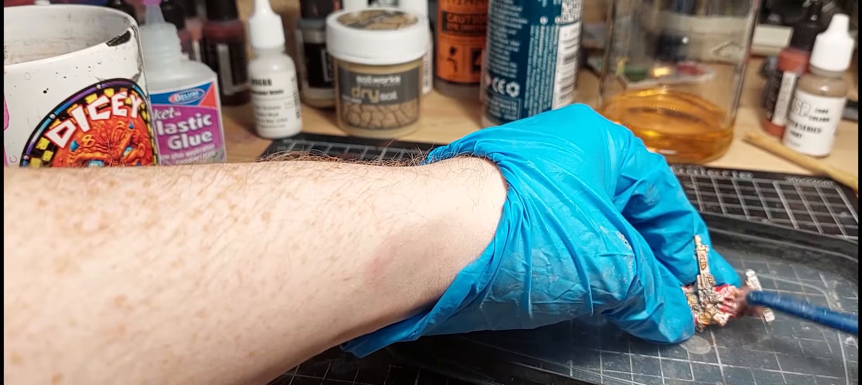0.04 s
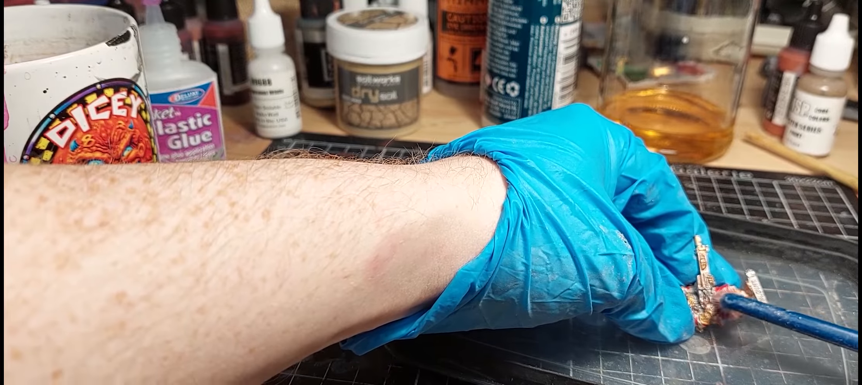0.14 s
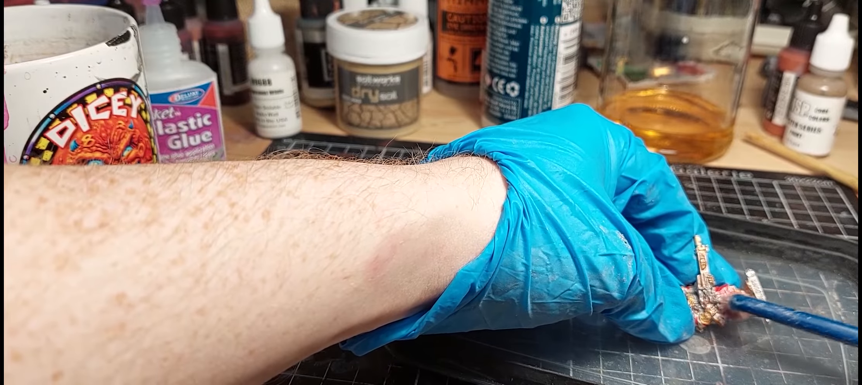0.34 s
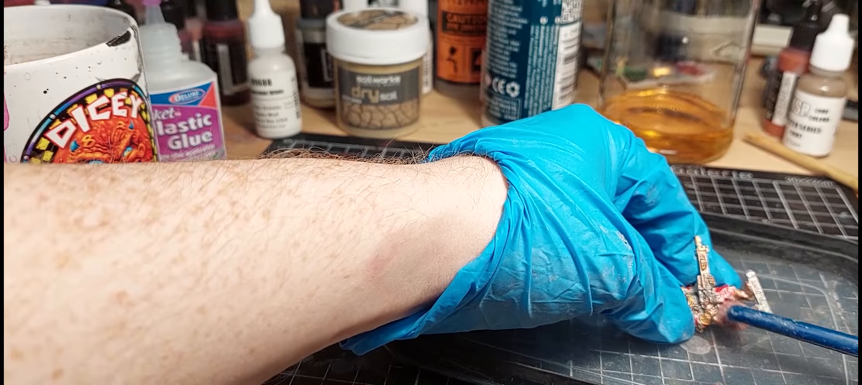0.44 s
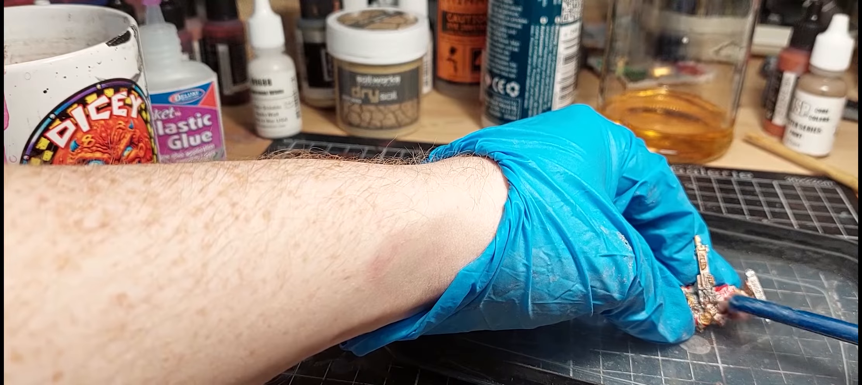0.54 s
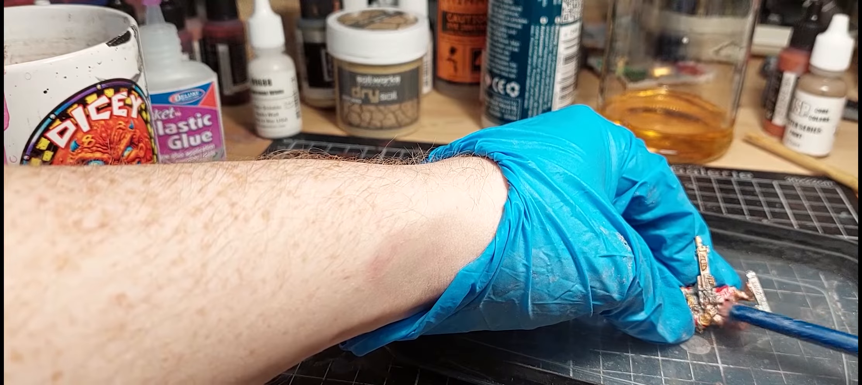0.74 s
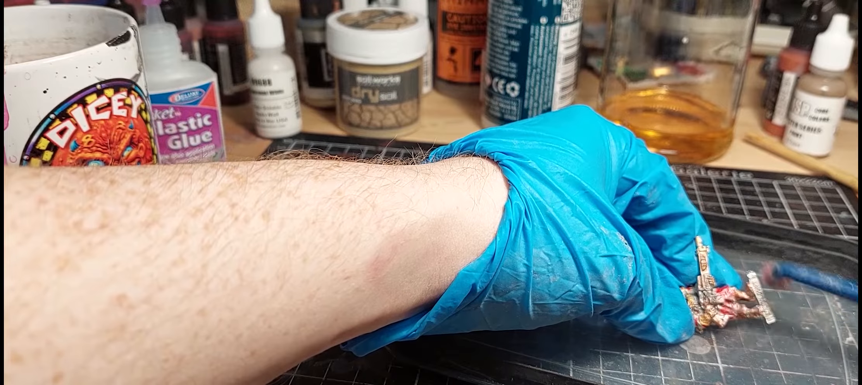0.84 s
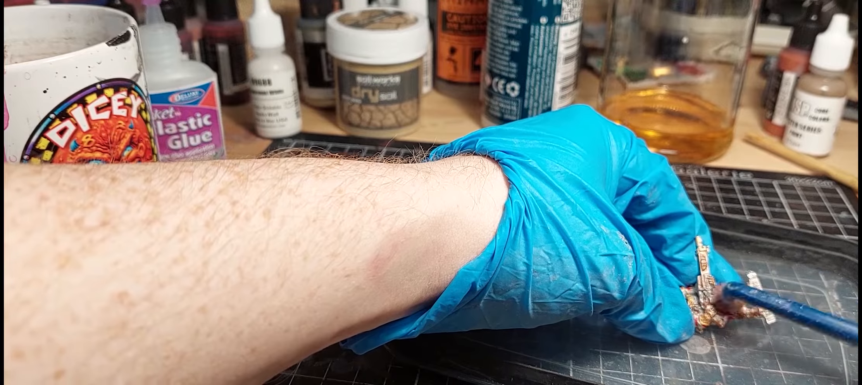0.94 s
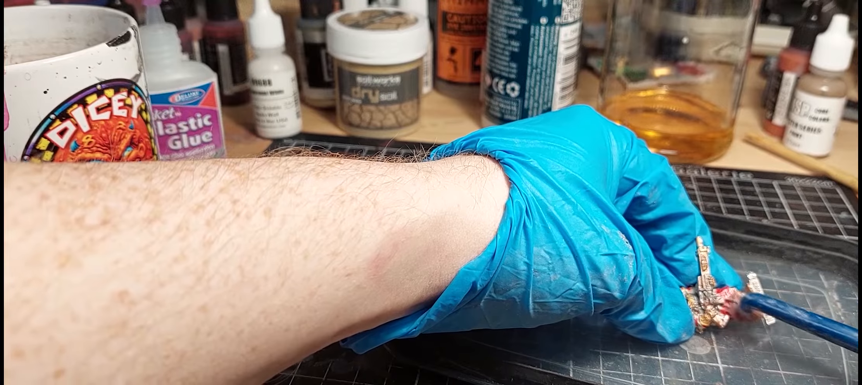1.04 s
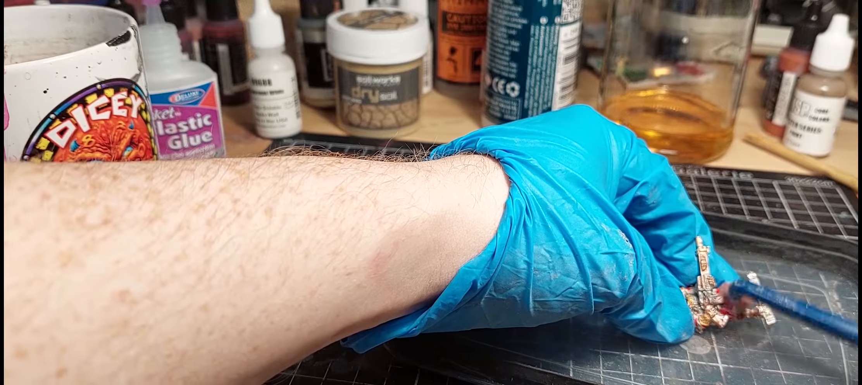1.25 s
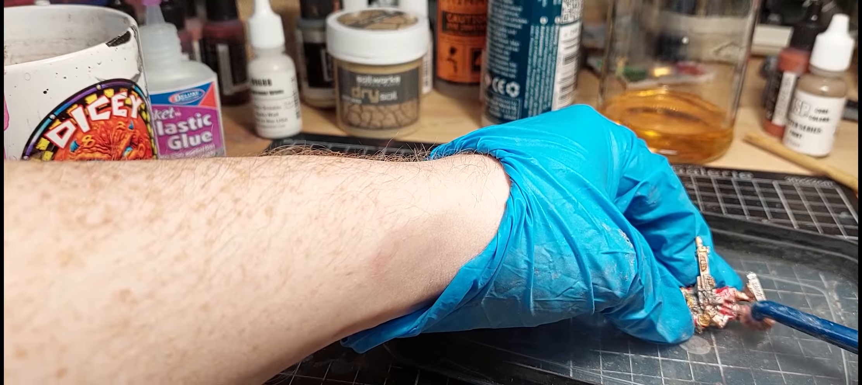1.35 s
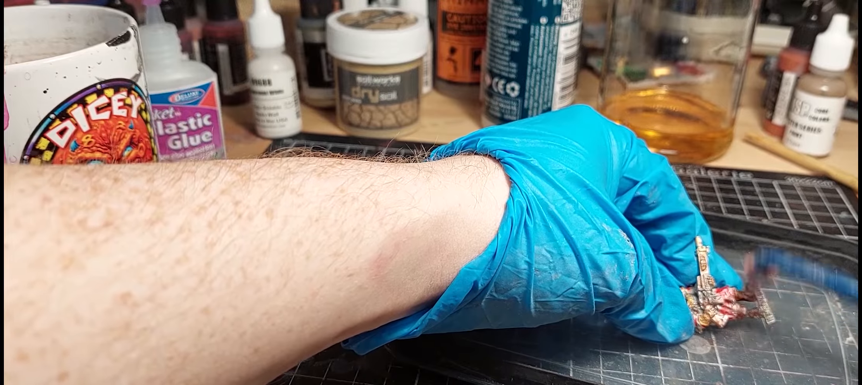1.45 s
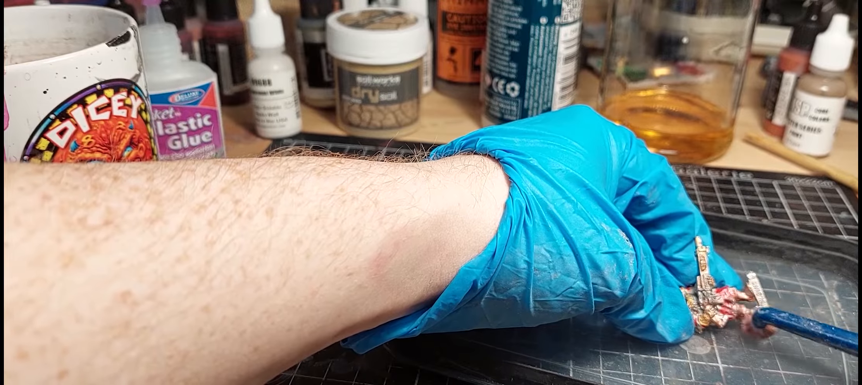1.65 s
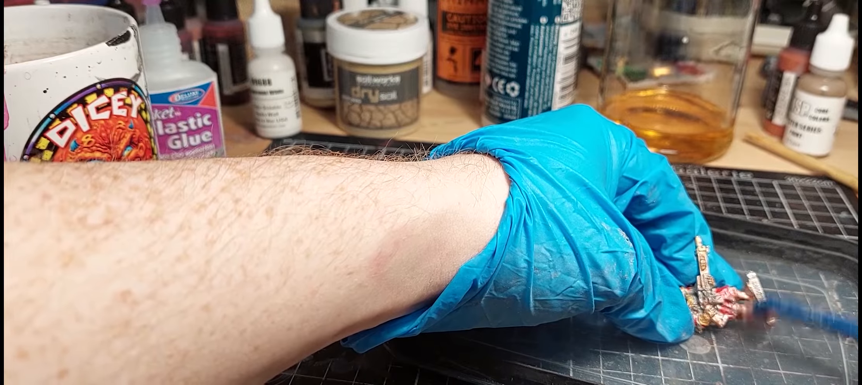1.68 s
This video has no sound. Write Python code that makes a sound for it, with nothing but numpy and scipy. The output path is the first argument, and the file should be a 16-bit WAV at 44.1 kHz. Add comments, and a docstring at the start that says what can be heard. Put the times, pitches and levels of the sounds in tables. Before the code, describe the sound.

Close, quick hissing strokes of a stiff little brush on a wet miniature, which now and then knocks softly against its tray.

```python
"""A small stiff brush scrubs a wet miniature figure held down on a tray, close by in a small room.
Tufts of bristles catch on the figure's edges and flick free with a tick; pressing harder adds a rasp
and makes the tray thrum. Now and then the figure knocks or judders on the tray, and once something
scuffs across it. Short echoes and a faint background rumble surround the work, heard in stereo."""
import sys
import numpy as np
from scipy import signal
from scipy.fft import rfft, irfft, next_fast_len
from scipy.io import wavfile
from scipy.ndimage import uniform_filter1d, map_coordinates

SR = 44100
rng = np.random.default_rng(int(sys.argv[2]) if len(sys.argv) > 2 else 0)


def bounce(signal):
    """Save signal as a 16-bit WAV file at the path given by the first command-line argument."""
    frames = np.transpose(np.atleast_2d(signal))
    limited = np.clip(frames, -1, 1)
    pcm = np.round(limited * 32767).astype(np.int16)
    wavfile.write(sys.argv[1], SR, pcm)


N = 302967


def amp(db):
    """Turn decibels into a gain to multiply by."""
    return 10 ** (np.asarray(db) / 20)


def rms(x):
    """The average strength of a signal (root mean square)."""
    return np.sqrt(np.mean(x ** 2))


def unit(x):
    """Scale a signal to an average strength of 1."""
    return x / np.sqrt(np.mean(x ** 2) + 1e-20)


def along(points, hz):
    """Read between the (frequency, value) rows of a table, on a log frequency axis."""
    f, values = np.transpose(points)
    return np.interp(np.log(hz + 1), np.log(f + 1), values)


def filtered(x, response):
    """Multiply each frequency in x by response(frequency)."""
    size = next_fast_len(N + SR // 4)
    return irfft(rfft(x, size) * response(np.fft.rfftfreq(size, 1 / SR)), size)[..., :N]


def coloured(x, spectrum):
    """Give x a tone colour (a balance of lows and highs), at strength 1."""
    return unit(filtered(x, lambda hz: amp(along(spectrum, hz))))


def resonance(f, centre, width):
    """How something that rings at one pitch answers to frequency f."""
    return 1j * f * width / (centre ** 2 - f ** 2 + 1j * f * width)


def wobble(rate):
    """A smooth random curve through rate points a second."""
    points = rng.standard_normal(int(N * rate / SR) + 4)
    return map_coordinates(points, [np.arange(N) * rate / SR])


def swell(start, length, attack_s, release_s, growth_db=0):
    """Gain of one touch: up 20 dB per attack_s, growing by growth_db, then down 20 dB per release_s."""
    t = np.arange(N) / SR - start
    rise = np.maximum(-t, 0) / attack_s
    fall = np.maximum(t - length, 0) / release_s
    still_to_grow = 1 - np.clip(t / length, 0, 1)
    return amp(np.maximum(-20 * (rise + fall) - growth_db * still_to_grow, -200))


# How alike left and right are: f/Hz, likeness (1 the same, 0 unrelated, -1 opposite)
STEREO_LIKENESS = [(100, 0.55), (300, 0.78), (500, 0.6), (900, 0.22), (2000, -0.14), (2700, -0.13),
                   (3500, 0.33), (4300, 0.19), (5200, 0.48), (6200, -0.3), (8200, -0.22), (9600, 0.16),
                   (11000, -0.054), (16000, 0.065)]
def noise_pair():
    """White noise that left and right partly share."""
    def shares(hz):
        angle = np.arccos(np.clip(along(STEREO_LIKENESS, hz), -1, 1)) / 2
        return np.array([np.cos(angle), np.sin(angle)])
    mid, side = filtered(rng.standard_normal((2, N)), shares)
    return np.array([mid + side, mid - side])


def slips(rate, life_s, spread_db):
    """Spiky power of tiny random slips, rate a second, each building up and dying away; average 1."""
    sizes = amp(spread_db * np.clip(rng.standard_normal(N), -1.7, 1.7)) ** 2
    spikes = sizes * (rng.random(N) < rate / SR)
    fading = signal.lfilter([1], [1, -np.exp(-1 / (life_s * SR))], spikes)
    power = np.abs(uniform_filter1d(fading, int(life_s * SR) + 1))
    return power / power.mean()


def grainy(power, steady_s):
    """Noise that follows a spiky power; the hand keeps the average force even over steady_s."""
    average = np.abs(uniform_filter1d(power, int(steady_s * SR) + 1)) + 1e-9
    return noise_pair() * np.sqrt(power / average)


def drifting(x, depth_db=2.0):
    """The tone colour drifts at random as the tuft bends and meets new edges."""
    spectrum = signal.stft(x, nperseg=512)[2]
    drift = rng.standard_normal(spectrum.shape[1:]) + rng.standard_normal(spectrum.shape) * 0.13
    drift = uniform_filter1d(drift, size=6, axis=1)  # smooth across frequency
    drift = uniform_filter1d(drift, size=16, axis=2)  # and across time
    return unit(signal.istft(spectrum * amp(depth_db * unit(drift)), nperseg=512)[1][:, :N])


# Brush strokes, with levels relative to each other:
# full contact t/s, time to rise 20 dB t/s, contact length t/s, hiss level/dB, rasp level/dB
BRUSH_STROKES = [ (0, .04, .008, -48, -62), (.066, .031, .011, -47, -63), (.152, .025, .018, -53, -72),
                 (.23, .041, .025, -44.5, -61), (.357, .046, .051, -53, -70.5),
                 (.448, .018, .103, -54, -70), (.596, .045, .012, -43.5, -60),
                 (.654, .043, .101, -48.5, -64), (.773, .043, .049, -40, -51), (.945, .04, .014, -55, -65),
                 (1.02, .049, .043, -44, -50), (1.294, .038, .021, -42, -54.5),
                 (1.569, .037, .034, -44.5, -57.5), (1.808, .015, .038, -60.5, -76.5),
                 (1.884, .038, .022, -39.5, -50), (1.984, .046, .021, -50.5, -68),
                 (2.081, .017, .038, -54, -60.5), (2.177, .064, .036, -42, -55),
                 (2.278, .039, .04, -54.5, -69.5), (2.432, .04, .04, -45.5, -57),
                 (2.55, .035, .043, -50, -66), (2.68, .05, .04, -47, -60.5),
                 (2.804, .051, .034, -45.5, -67), (2.847, .024, .035, -46.5, -42),
                 (2.938, .045, .014, -47, -45.5), (3.031, .019, .008, -48, -66),
                 (3.129, .03, .008, -46.5, -58), (3.18, .035, .064, -53, -66.5),
                 (3.33, .047, .065, -61, -75), (3.472, .05, .045, -45, -57.5),
                 (3.587, .039, .073, -51, -69), (3.73, .055, .05, -44.5, -59.5),
                 (3.833, .025, .045, -53.5, -69.5), (3.99, .052, .03, -41.5, -55),
                 (4.158, .02, .03, -62, -67), (4.197, .025, .025, -53, -60.5), (4.25, .025, .04, -64, -65),
                 (4.34, .07, .16, -70, -69), (4.742, .07, .06, -56.5, -70),
                 (4.832, .051, .05, -46.5, -53.5), (4.955, .038, .038, -58, -76),
                 (5.046, .04, .02, -56.5, -66.5), (5.158, .039, .024, -63.5, -74),
                 (5.256, .043, .01, -53, -69), (5.301, .034, .072, -44, -58),
                 (5.423, .029, .01, -55, -69.5), (5.573, .022, .058, -36.5, -56),
                 (5.625, .05, .037, -46, -52.5), (5.841, .022, .046, -44.5, -54.5),
                 (5.909, .041, .015, -36.5, -45.5), (5.981, .024, .008, -45.5, -68),
                 (6.12, .023, .051, -44, -49.5), (6.229, .028, .057, -51.5, -66),
                 (6.351, .041, .027, -38.5, -49.5), (6.459, .049, .04, -42.5, -51.5),
                 (6.565, .043, .035, -44, -51), (6.676, .04, .03, -45, -56.5),
                 (6.762, .028, .04, -40.5, -48.5), (6.861, .026, .019, -48.5, -65)]
def strokes(bend_db=3, lift_s=.049):
    """Gains of hiss and rasp as each tuft lands, bends against the figure and slides off."""
    power = np.zeros((2, N))
    for start, landing, length, *db in BRUSH_STROKES:
        power += (amp(db)[:, None] * swell(start, length, landing, lift_s, bend_db)) ** 2
    return np.sqrt(power)


def brush(hiss_db=2.2, rasp_db=3, thrum_db=3, drag_db=-14.5, limit_db=-53.5,
          snap_rasp_db=-9, crowd_db=-43):
    """Single bristles tick in dense clumps as whole tufts catch and let go."""
    hiss, rasp = strokes()
    # a light touch crackles; a hard stroke lays down so many tufts that they merge
    tufts = .5 + hiss / amp(crowd_db) + slips(rate=150, life_s=.0009, spread_db=4)
    bristles = .5 + slips(rate=3600, life_s=.00044, spread_db=0.5)
    ridges = amp(1.3 * wobble(rate=45))  # the tips ride over ridges and hollows
    snap = snaps()
    friction = amp(hiss_db) * hiss * ridges * grainy(tufts * bristles, steady_s=.03) + snap
    tips = figure(friction) * rms(friction)
    scrape = amp(rasp_db) * rasp * ridges * grainy(tufts, steady_s=.063) + amp(snap_rasp_db) * snap
    pressed = pressed_tuft(scrape)
    # the drag of the brush passes through the figure into the tray
    force = np.hypot(amp(thrum_db) * rasp, amp(drag_db) * hiss)
    force = force / np.sqrt(1 + (force / amp(limit_db)) ** 2)  # the gloved hand damps strong shoves
    thrum = tray(noise_pair() * force) * rms(force)
    return tips + pressed + thrum


# Tone colour of the bristle tips: f/Hz, relative level/dB
TIP_COLOUR = [(300, -23.5), (1200, -13.5), (2800, -52), (4000, -4.5), (7000, -0.5), (11000, -3.5),
              (16000, -2.5)]
# Pitches at which the figure rings: f/Hz, width f/Hz, left minus right level/dB,
# then relative level/dB when brushed at spot 0, at spot 1 and at spot 2
FIGURE_RINGS = [(1830, 670, -14, -8.5, -8, -30), (2730, 570, -3, -11, -60, 3), (3600, 520, 9, 3.5, 0.5, 2),
                (4300, 610, 1, -7, 4.5, 5.5), (5320, 1000, -0.5, 8.5, 6.5, 7), (6400, 790, -11, -3, -8, -8),
                (7800, 1180, -12, 1.5, -3.5, -3.5), (9470, 1000, -2.5, 3.5, 6.5, 2),
                (10720, 1900, 2, 3, -1.5, -1), (12200, 1760, -7.5, 2, -1, 0.5),
                (14000, 2900, -16.5, -3.5, -7, -10)]
# Where the brush is on the figure: t/s, spot (0, 1 or 2)
BRUSH_PATH = [(0, 0), (2.0, 0), (2.08, 1), (2.79, 1), (2.83, 2), (2.97, 2), (3.01, 1), (4.1, 1), (4.7, 0),
              (5.4, 0), (5.52, 2), (6.87, 2)]
def figure(friction):
    """Bristle noise rings the figure; the spot being brushed decides which pitches stand out."""
    def response(f, spot):
        power = amp(along(TIP_COLOUR, f)) ** 2
        for hz, width, pan_db, *db in FIGURE_RINGS:
            gains = amp([[db[spot] + pan_db / 2], [db[spot] - pan_db / 2]])
            power = power + gains ** 2 * np.abs(resonance(f, hz, width)) ** 4
        return unit(np.sqrt(power))
    position = np.interp(np.arange(N) / SR, *np.transpose(BRUSH_PATH))
    ringing = np.zeros((2, N))
    for spot in range(3):
        nearness = np.maximum(0, 1 - abs(position - spot))
        ringing += filtered(friction * nearness, lambda f: response(f, spot))
    return drifting(ringing)


# Tone colour of the rasp: f/Hz, relative level/dB
RASP_COLOUR = [(200, -32), (600, -16), (950, -10.5), (1600, -5.5), (2000, -1.5), (2500, -2.5), (3300, 0.5),
               (5000, -4.5), (9000, -11), (16000, -18)]
def pressed_tuft(scrape):
    """A tuft pressed hard rasps, lower in tone than the hiss of its tips."""
    return drifting(coloured(scrape, RASP_COLOUR)) * rms(scrape)


# Low pitches at which the tray rings: f/Hz, width f/Hz (wider dies sooner), relative level/dB
TRAY_RINGS = [(142.2, 11.2, 3.5), (211, 56, -6.5), (269.4, 33, 3.5), (368.5, 24.3, 0.5),
              (428.4, 41.5, -4.5), (508, 30, -8), (591, 44, -11.5)]
# The tray sits a little to the right: left level/dB, right level/dB
TRAY_BALANCE = [
    [-1],
    [-0.5],
]
def tray(force):
    """A shaking force makes the tray thrum at its own low pitches."""
    def response(f):
        return sum((-1) ** k * amp(db) * resonance(f, hz, width)
                   for k, (hz, width, db) in enumerate(TRAY_RINGS))
    return unit(filtered(force, response)) * amp(TRAY_BALANCE)


# Tone colour of the quiet room: f/Hz, relative level/dB
BACKGROUND_COLOUR = [(20, -20), (55, -4), (140, 8.5), (300, 4), (600, -3), (1200, -7.5), (4000, -16.5),
                     (16000, -29)]
def background(level_db=-71):
    """A faint, steady rumble fills the room."""
    return amp(level_db) * coloured(noise_pair(), BACKGROUND_COLOUR)


# The figure knocks on the tray: t/s, relative level/dB, favoured pitch f/Hz
FIGURE_KNOCKS = [(0.174, -48, 142), (0.653, -41, 267), (2.087, -32, 250), (2.2, -39, 260),
                 (2.873, -34, 287), (2.949, -28, 350), (2.964, -29, 380), (2.985, -27.5, 410),
                 (3.13, -29.5, 268), (3.163, -41, 264), (4.03, -43, 137), (4.546, -35, 386),
                 (4.564, -35.5, 383), (4.758, -44, 252), (5.052, -43, 280), (5.922, -30.5, 356),
                 (6.121, -39.5, 350), (6.157, -28, 330), (6.377, -29, 372), (6.8, -31.5, 328)]
def knocks(gain_db=-1, attack_s=.0055, focus_db_per_octave=16):
    """Soft knocks ring the tray; the grip favours the tray's pitches near one frequency."""
    t = np.arange(SR // 3) / SR
    ring_hz, width, _ = np.transpose(TRAY_RINGS)
    fades = np.exp(-np.pi * width[:, None] * t) * (1 - np.exp(-(t / attack_s) ** 2))
    phases = rng.random((len(FIGURE_KNOCKS), len(TRAY_RINGS)))
    out = np.zeros(N + SR)
    for (start, db, hz), phase in zip(FIGURE_KNOCKS, phases):
        share = amp(-focus_db_per_octave * np.abs(np.log2(ring_hz / hz)))
        rings = fades * np.sin(2 * np.pi * (ring_hz[:, None] * t + phase[:, None]))
        out[round(start * SR):][:len(t)] += amp(db + gain_db) * share @ rings / np.linalg.norm(share)
    return out[:N] * amp(TRAY_BALANCE)


# Tufts snap off an edge: t/s, relative level/dB before the loudest are softened
TUFT_SNAPS = [(0.234, -38), (0.589, -41), (0.6048, -30.5), (0.742, -32), (0.7704, -30), (0.9974, -36),
              (1.0287, -18), (1.523, -51), (1.674, -49), (1.8605, -35), (1.8822, -27.5), (2.0843, -29),
              (2.196, -41), (2.4351, -35.5), (2.6881, -32.5), (2.847, -37), (2.8723, -26), (3.034, -34),
              (3.205, -45), (4.0467, -35), (4.7472, -46), (5.297, -37), (5.345, -31), (5.5607, -40),
              (5.9177, -25.5), (6.1587, -28.5), (6.763, -31.5), (6.796, -30)]
def snaps(gain_db=-4, tick_s=.012, trail_db=-11, trail_s=.11, limit_db=-29):
    """A tuft springs off an edge with a sharp tick, and a few bristles trail after it."""
    t = np.arange(SR // 10) / SR
    tick = amp(-60 * t / tick_s) * (1 - np.exp(-t / .0003))
    trail = amp(trail_db - 60 * t / trail_s)
    bursts = np.zeros(N + SR)
    for start, db in TUFT_SNAPS:
        bursts[round(start * SR):][:len(t)] += amp(db + gain_db) * (tick + trail)
    limit = amp(limit_db)  # bristles bend away under a hard blow
    return noise_pair() * limit * np.tanh(bursts[:N] / limit)


# The held figure judders: start t/s, length t/s, relative boom level/dB, chatter level/dB
FIGURE_JUDDERS = [(0.868, .05, -38, -38.5), (1.038, .03, -62, -66)]
# Tone colour of the chatter: f/Hz, relative level/dB
CHATTER_COLOUR = [(88, -42), (150, -32), (216, -1.5), (354, -6), (757, -29), (963, -27.5), (1500, -43),
                  (1950, -79), (3300, -120)]
def judder(rate_hz=145, boom_db=-.5, unsteady=.0635, chatter_share=.23):
    """Sticking and slipping lock onto the tray's lowest pitch; uneven chatter leads in, then fades."""
    boom_gain = chatter_gain = 0
    for start, length, low_db, chatter_db in FIGURE_JUDDERS:
        boom_gain += amp(low_db + boom_db) * swell(start, length, attack_s=.031, release_s=.059)
        chatter_length = chatter_share * length
        chatter_gain += amp(chatter_db) * swell(start, chatter_length, attack_s=.06, release_s=.071)
    waver = unit(uniform_filter1d(rng.standard_normal(N), size=600))
    pitch_hz = rate_hz * (1 + unsteady * waver)
    boom = boom_gain * np.sqrt(2) * np.sin(2 * np.pi * np.cumsum(pitch_hz) / SR)
    chatter = chatter_gain * coloured(noise_pair(), CHATTER_COLOUR)
    return (boom + chatter) * amp(TRAY_BALANCE)


# Tone colour of the scuff: f/Hz, relative level/dB
SCUFF_COLOUR = [(180, -42), (300, -10), (374, -14), (572, -12.5), (1110, -11), (1510, -5), (1670, -14),
                (2960, -14.5), (10000, -33), (15000, -44), (22000, -120)]
def scuff(start_s=4.54, length_s=.012, level_db=-45.5):
    """Something slides briefly on the tray; its tiny slips blur into a dull rub."""
    gain = amp(level_db) * swell(start_s, length_s, attack_s=.017, release_s=.056)
    rub = grainy(.5 + slips(rate=600, life_s=.001, spread_db=3), steady_s=.02)
    return gain * coloured(rub, SCUFF_COLOUR)


# How long the room rings: f/Hz, time to fade by 60 dB t/s
ROOM_FADE = [(150, 0.24), (500, 0.31), (3000, 0.14), (8000, 0.034), (16000, 0.028)]
def room(x, tail_db=-13, near_db=-11, echoes=6):
    """Close echoes off the table and its bottles, then a short blurred tail, different on each side."""
    hz, t, spectrum = signal.stft(rng.standard_normal((2, SR // 2)), SR, nperseg=256)
    fade = amp(-60 * t / along(ROOM_FADE, hz)[:, None])
    tail = signal.istft(spectrum * fade, SR, nperseg=256)[1]
    tail = np.pad(tail / np.linalg.norm(tail[0]), ((0, 0), (SR // 300, 0)))  # arrives a moment later
    delays_s = rng.uniform(.001, .006, (echoes, 2, 1))
    def bounces(f):
        delayed = np.exp(-2j * np.pi * f * delays_s).sum(axis=0) / np.sqrt(echoes)
        return delayed * f / np.hypot(f, 1000)  # small things only throw back the treble
    near = filtered(x, bounces)
    far = signal.fftconvolve(x, tail, axes=1)[:, :N]
    return x + amp(near_db) * near + amp(tail_db) * far


def scene():
    """The work at the table with its echoes, over the faint background."""
    return room(brush() + knocks() + judder() + scuff()) + background()


def record(dry, bass_hz=55, top_hz=15850):
    """Thin the deep bass and keep nothing above top_hz."""
    return filtered(dry, lambda hz: (hz < top_hz) * hz ** 2 / np.hypot(hz ** 2, bass_hz ** 2))


dry = scene()
out = record(dry)
bounce(out)
```